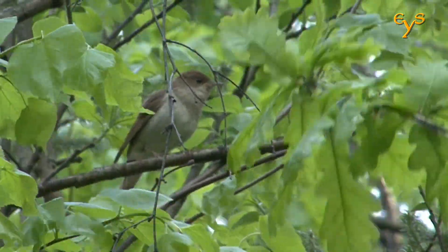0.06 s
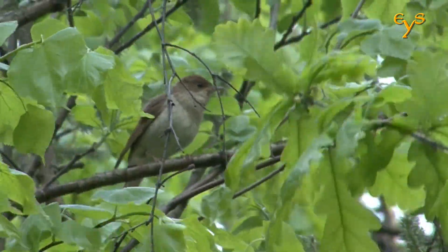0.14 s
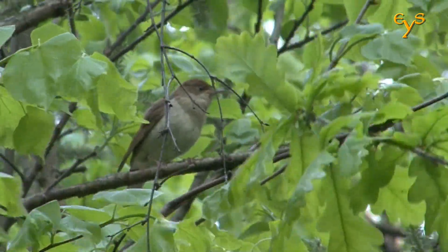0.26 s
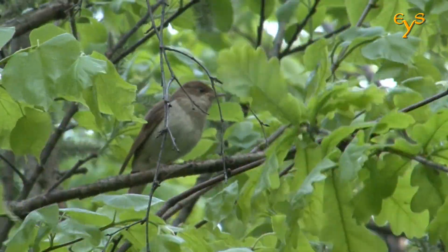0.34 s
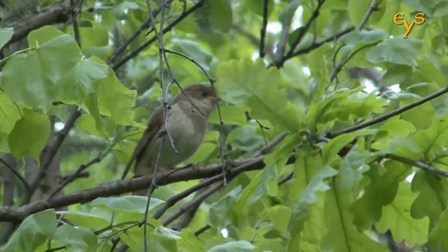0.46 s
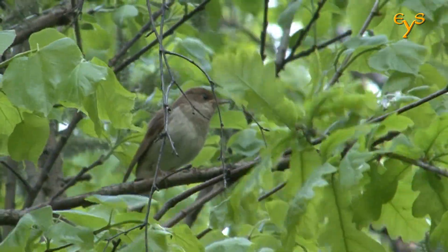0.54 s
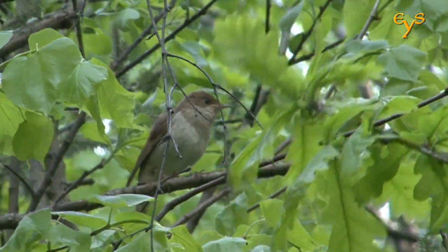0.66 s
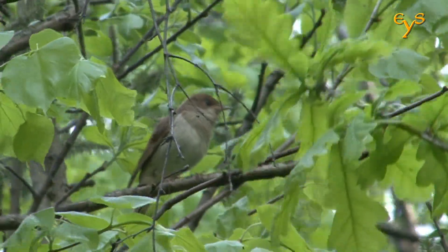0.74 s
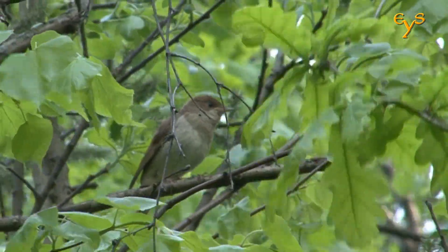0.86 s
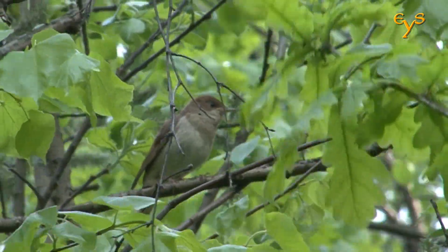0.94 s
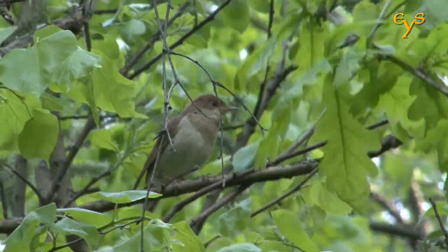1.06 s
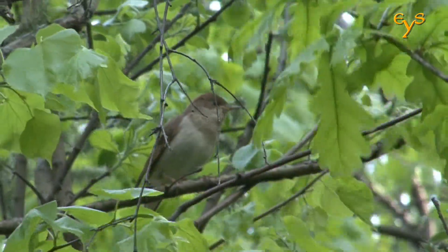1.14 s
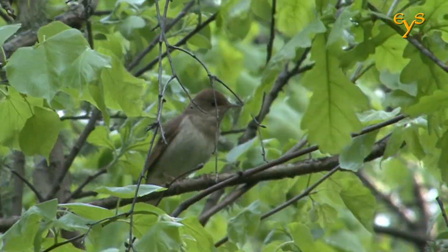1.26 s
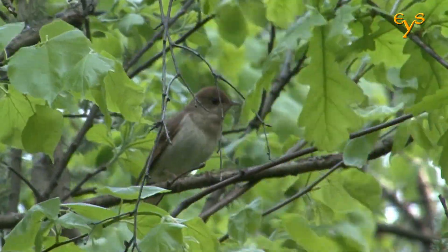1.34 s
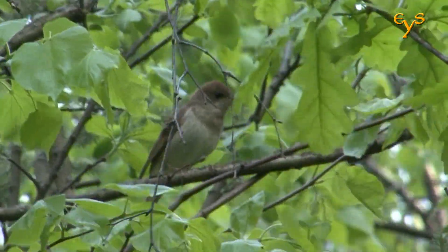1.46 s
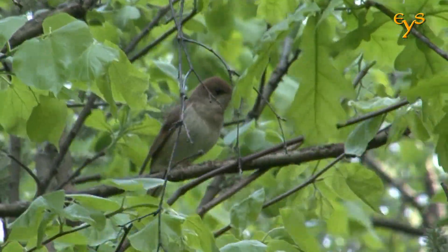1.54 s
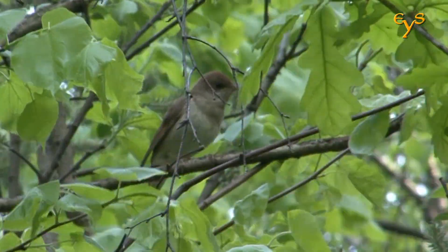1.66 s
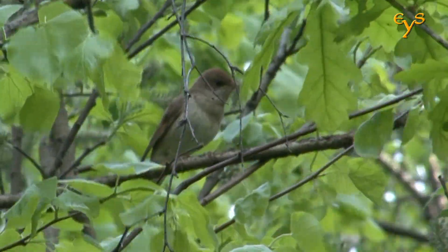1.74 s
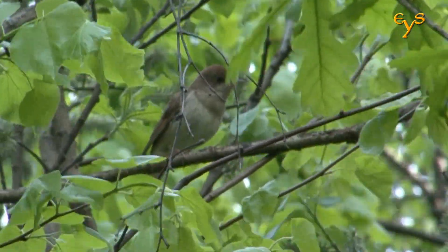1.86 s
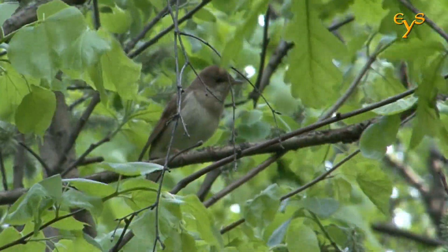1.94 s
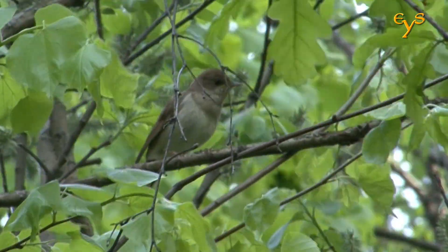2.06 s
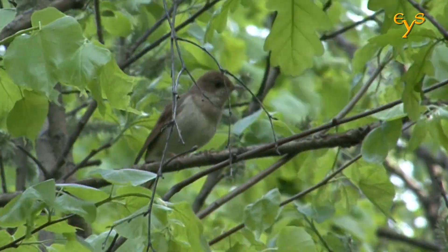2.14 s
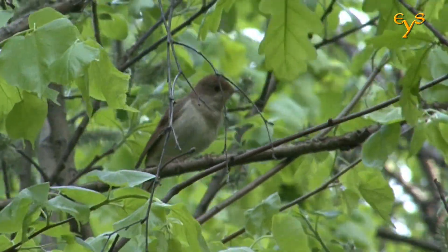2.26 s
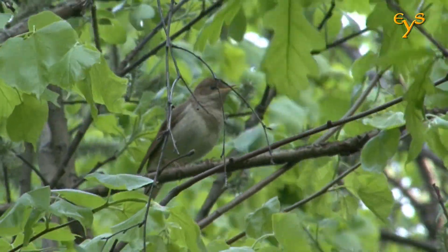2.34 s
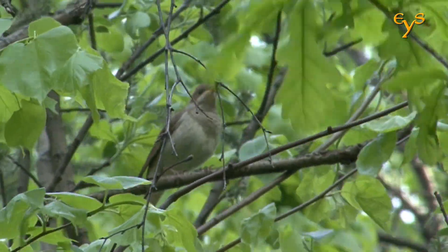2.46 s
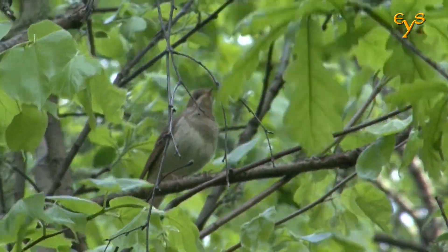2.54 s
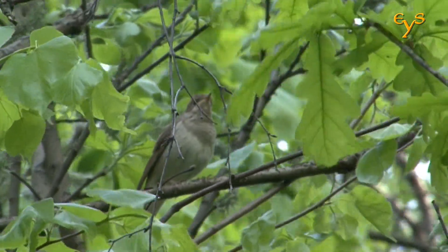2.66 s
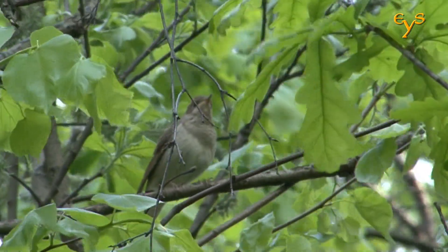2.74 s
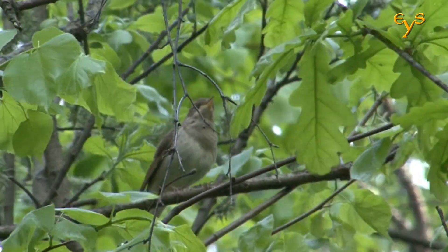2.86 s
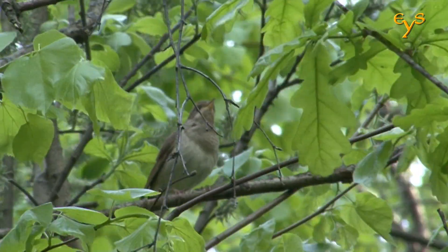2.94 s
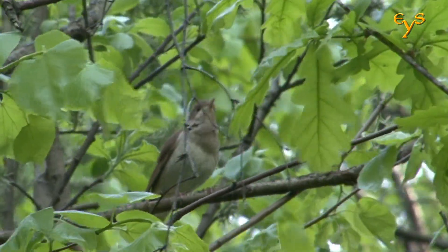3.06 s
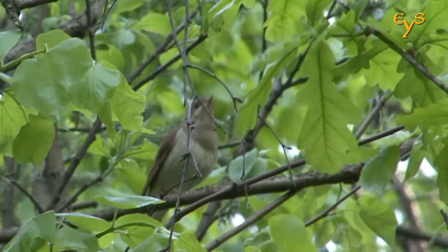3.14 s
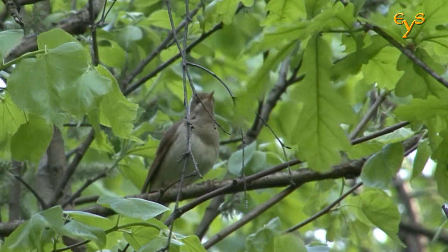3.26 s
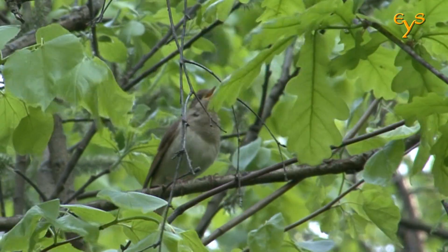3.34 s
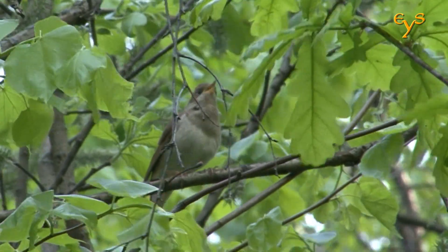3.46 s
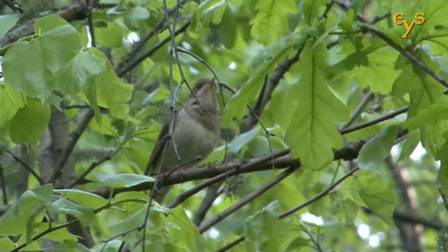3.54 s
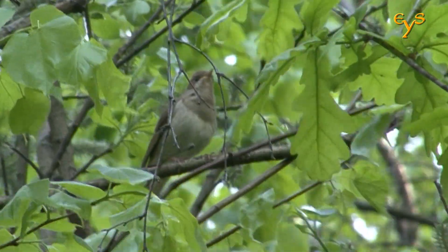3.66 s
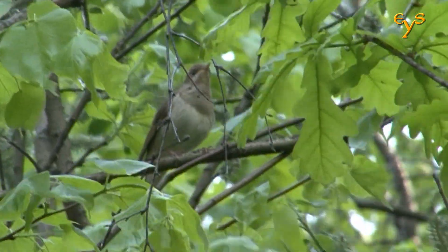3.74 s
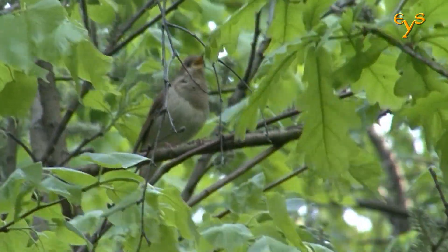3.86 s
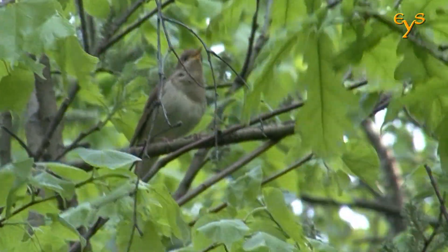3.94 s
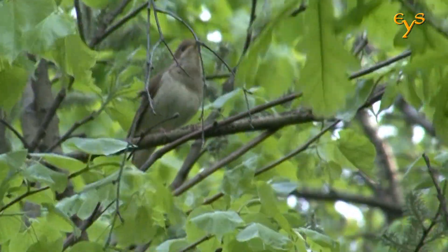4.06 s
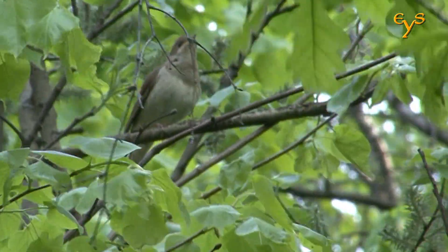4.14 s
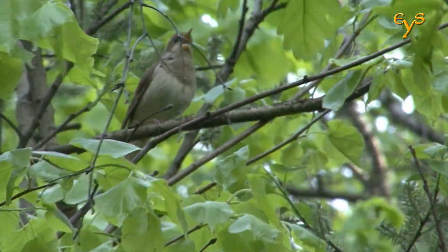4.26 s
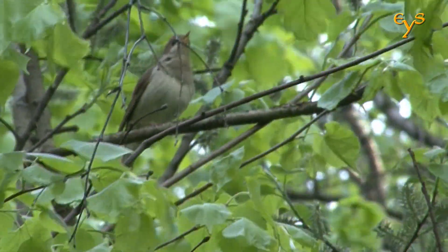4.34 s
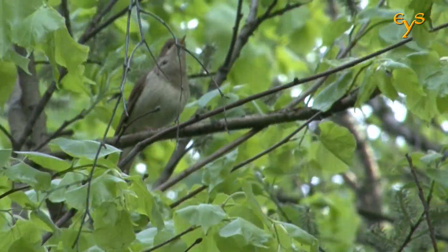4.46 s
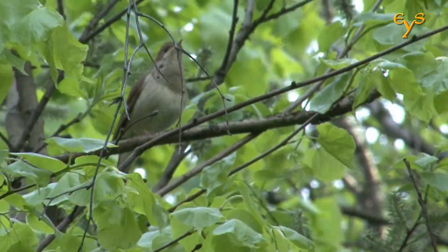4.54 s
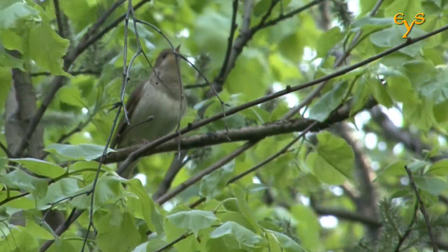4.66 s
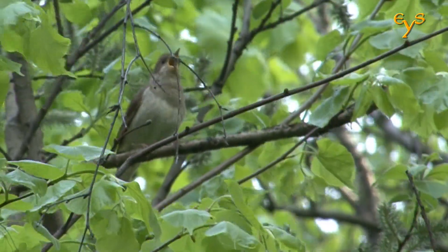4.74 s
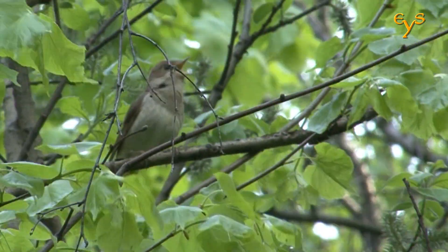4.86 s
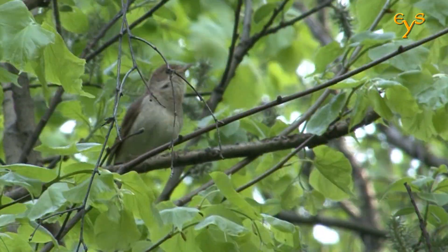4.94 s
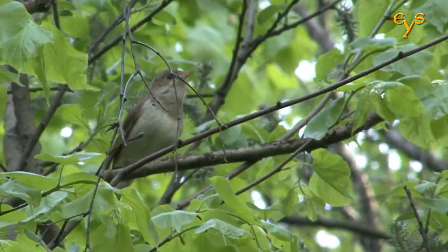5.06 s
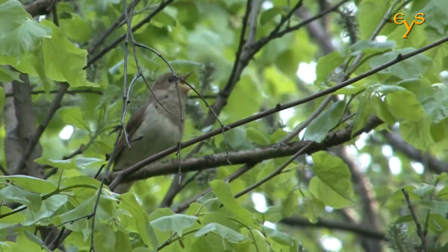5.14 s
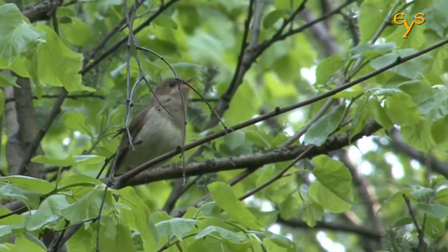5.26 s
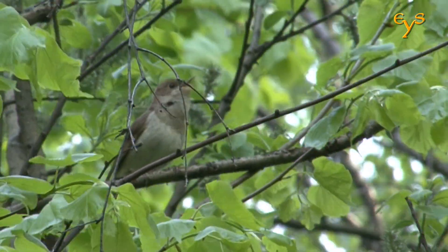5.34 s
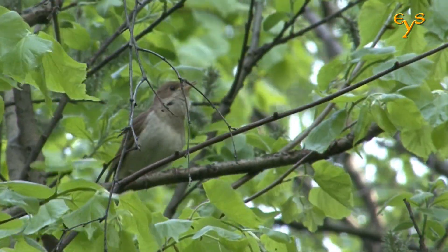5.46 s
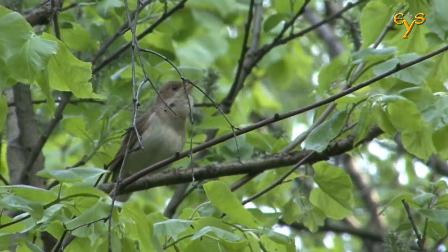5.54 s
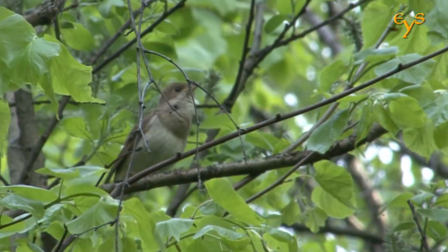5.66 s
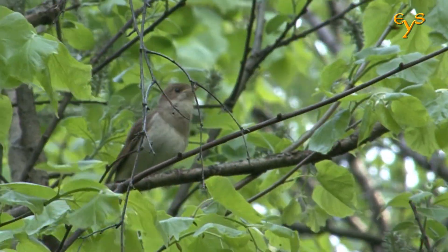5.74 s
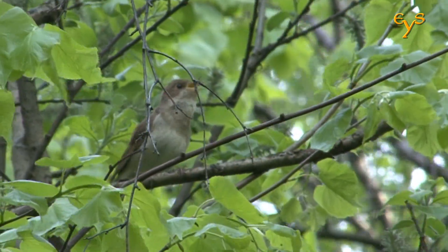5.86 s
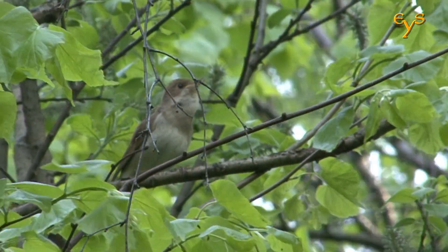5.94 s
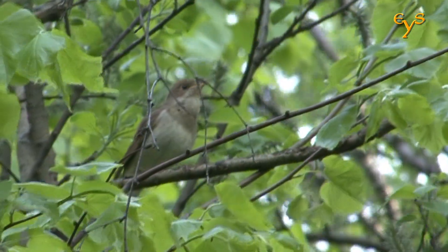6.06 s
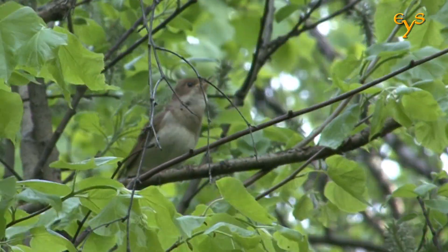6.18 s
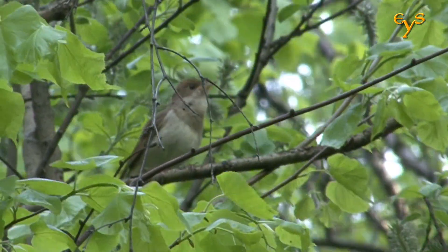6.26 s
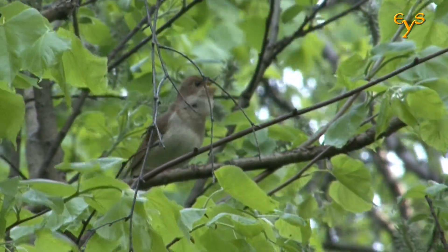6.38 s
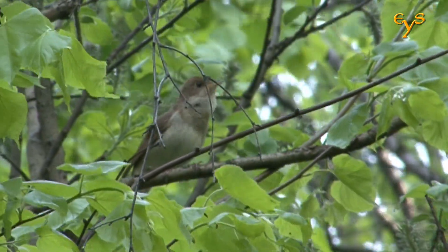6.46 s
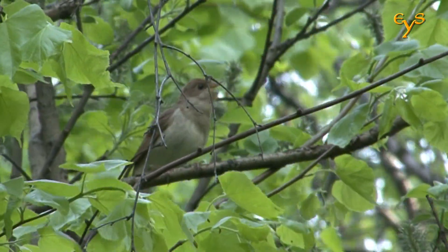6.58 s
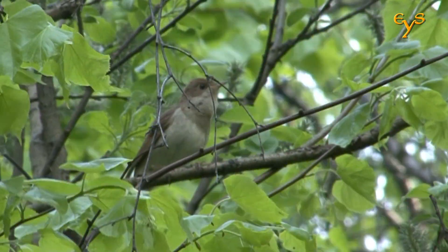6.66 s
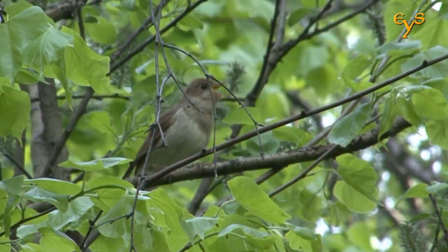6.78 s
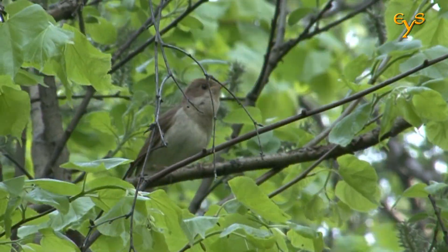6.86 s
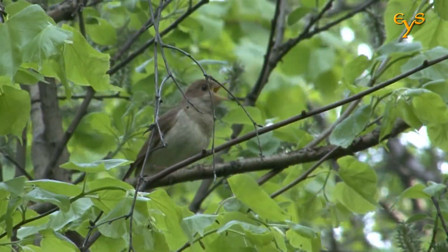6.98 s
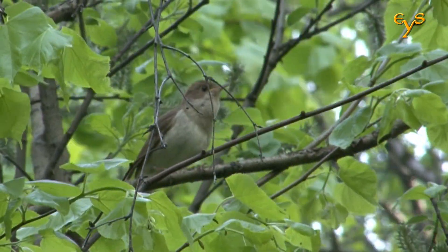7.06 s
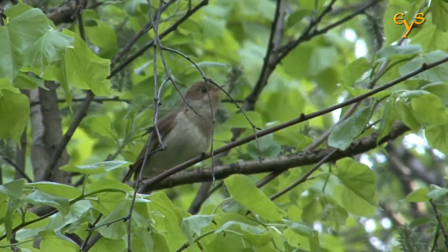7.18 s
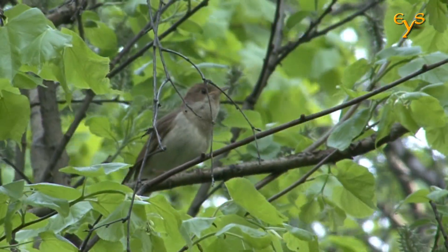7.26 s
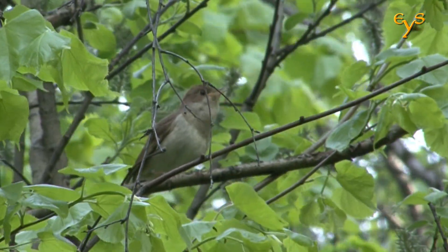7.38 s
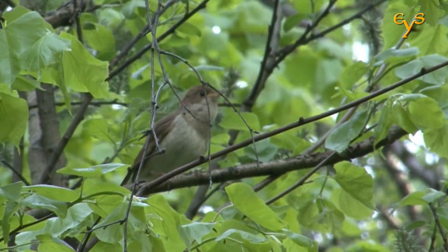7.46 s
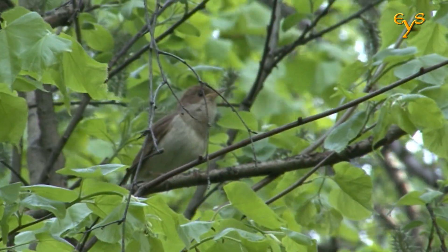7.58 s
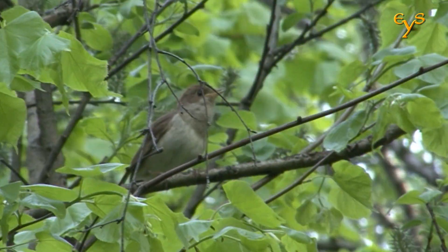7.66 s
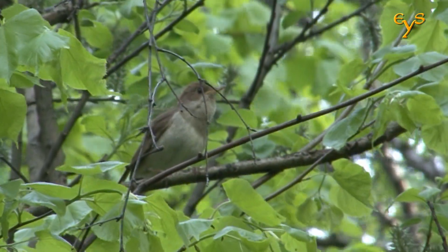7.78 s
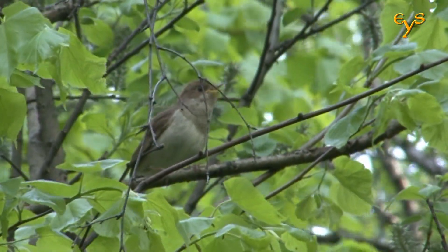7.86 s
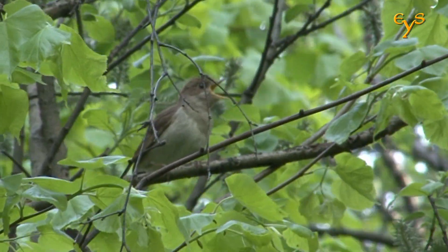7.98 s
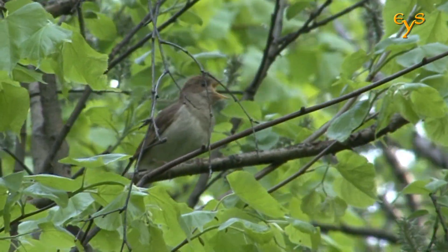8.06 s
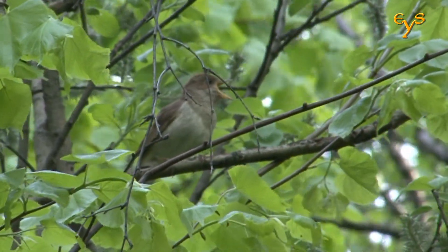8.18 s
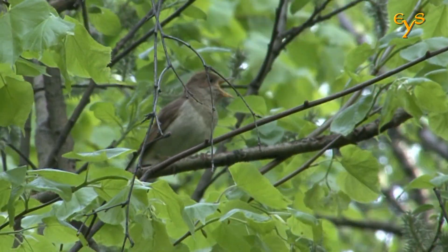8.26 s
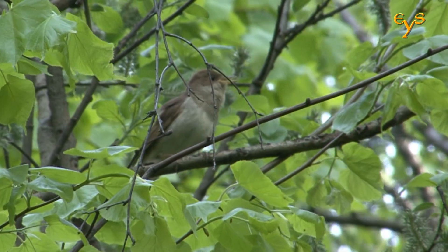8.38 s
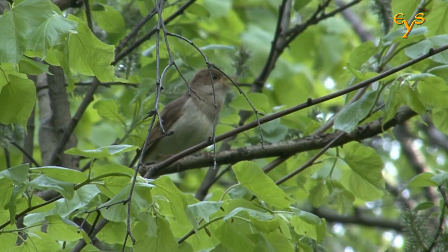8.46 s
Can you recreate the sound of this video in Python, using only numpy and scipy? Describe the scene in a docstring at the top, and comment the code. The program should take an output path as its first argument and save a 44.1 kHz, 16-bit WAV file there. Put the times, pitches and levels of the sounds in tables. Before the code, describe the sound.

Faint chirps and a repeated high motif come from deep among trees, above a distant engine-like rumble. After two seconds a close songbird enters very quietly, then swells through paired clear whistles and quick falling slurs. Soft hoots lead into diving, flute-like notes; separate hard clicks follow, ending in a fast raspy trill. Stereo outdoor sound, singer mostly direct, notes scattered by foliage.

```python
"""Nightingale in a spring wood

A nightingale sings one phrase from a branch: a thin high note, six swelling pairs of whistle and
downslur, two low flute figures, seven dry clicks and a fast rattle. Notes are gliding sines with
overtones; clicks and rattle are coloured noise, the clicks with added pulses. Other birds call farther
off in pure tones. Leaves and trunks scatter every note as echoes over a steady distant rumble of
shaped noise, with engine drones, leaf hiss and one faint tone."""
import sys
import numpy as np
from scipy import signal
from scipy.fft import rfft, irfft, next_fast_len
from scipy.io import wavfile
from scipy.ndimage import uniform_filter1d

SR = 44100
rng = np.random.default_rng(int(sys.argv[2]) if len(sys.argv) > 2 else 0)


def persist_wave(psi):
    """Save psi, clipped to +-1, as 16-bit WAV."""
    counts = np.round(np.clip(psi, -1, 1) * 32767).astype(np.int16)
    wavfile.write(sys.argv[1], SR, np.atleast_2d(counts).T)


N = 375291
CUT_HZ = 15900  # top of the recorded band


def amp(db):
    """Decibels to gain."""
    return 10 ** (np.asarray(db) / 20)


def unit(x):
    """Scales to rms 1."""
    return x / np.sqrt(np.mean(x ** 2) + 1e-20)


def read(points, hz):
    """Reads a table on a log-frequency axis."""
    f, value = np.transpose(points)
    return np.interp(np.log(hz + 1), np.log(f + 1), value)


def add(mix, s, sound):
    """Mixes a sound in at time s."""
    part = mix[max(round(s * SR), 0):][:len(sound)]
    part += sound[:len(part)]


def wander(n, hz):
    """Smooth random drift of about rms 1, mostly slower than hz."""
    size = next_fast_len(n + SR // 4)
    f = np.fft.rfftfreq(size, 1 / SR)
    spectrum = rfft(rng.standard_normal(size)) * np.exp(-(f / hz) ** 2)
    return unit(irfft(spectrum))[:n]


def colour(x, points):
    """Minimum-phase filter with the given spectrum, so that nothing sounds before its cause."""
    gain_db = read(points, abs(np.fft.fftfreq(2048, 1 / SR)))
    response = np.exp(np.conj(signal.hilbert(np.log(amp(gain_db)))))
    return signal.oaconvolve(x, np.fft.ifft(response).real[:SR // 100])


def stereo_noise(spectrum):
    """Noise of one spectrum at both microphones, less alike from left to right toward the treble."""
    # left-right likeness: [f/Hz, correlation]
    likeness = [(60, 1), (130, 0.97), (290, 0.89), (640, 0.59), (1410, 0.61), (3100, 0.49), (7000, 0.37),
                (15000, 0.54)]
    # left minus right: [f/Hz, level/dB]
    balance = [(120, 0), (400, -0.7), (1200, -1.8), (4400, -1.2), (8000, 0)]
    hz = np.fft.rfftfreq(N, 1 / SR)
    same = read(likeness, hz)
    lean = amp(read(balance, hz) * np.array([[.5], [-.5]]))
    a, b = rng.standard_normal((2, len(hz))) + 1j * rng.standard_normal((2, len(hz)))
    both = np.array([a, same * a + np.sqrt(1 - same ** 2) * b])
    return unit(irfft(both * lean * amp(read(spectrum, hz)), N))


def distant_rumble(level_db=-37.5, swell_db=0.31, swell_hz=0.94):
    """Low-heavy noise from far away, its level all but steady."""
    # spectrum before levelling: [f/Hz, level/dB]
    rumble_colour = [(12, -34), (20, -12.5), (87, -2), (103, -5), (119, -6), (157, -7.5), (193, -11),
                     (237, -10), (454, -12), (489, -12), (671, -13.5), (904, -12), (1110, -11),
                     (1220, -13.5), (1700, -22), (2210, -29.5), (3740, -120)]
    return amp(level_db + swell_db * wander(N, swell_hz)) * stereo_noise(rumble_colour)


def leaf_hiss(level_db=-46, swell_db=0.53, swell_hz=2):
    """Broad noise of leaves, swelling slightly."""
    # spectrum before levelling: [f/Hz, level/dB]
    leaf_colour = [(1000, -10), (1600, 2.5), (2200, -2), (3000, -7), (4200, -9), (5800, -8.5), (7500, -12),
                   (10000, -19.5), (12500, -27), (15000, -33), (16000, -37)]
    return amp(level_db + swell_db * wander(N, swell_hz)) * stereo_noise(leaf_colour)


def engine_drones():
    """Far engines: narrow bands, each a sine and a cosine whose strengths drift apart."""
    # drones: [f/Hz, drift rate of the strengths/Hz, level/dB]
    engines = [(94.6, 7.1, -45), (168, 8.1, -54.5)]
    t = np.arange(N) / SR
    out = np.zeros(N)
    for hz, drift_hz, db in engines:
        in_phase = wander(N, drift_hz) * np.cos(2 * np.pi * hz * t)
        quadrature = wander(N, drift_hz) * np.sin(2 * np.pi * hz * t)
        out += amp(db) * (in_phase + quadrature)
    return out


def faint_tone(hz=1140, drift_hz=4, level_db=-44.5):
    """A distant sine, slightly unsteady in pitch, that fades in and out once."""
    phase = 2 * np.pi * np.cumsum(hz + drift_hz * wander(N, 13)) / SR
    fade = np.interp(np.arange(N) / SR, [.95, 1.15, 1.85, 2.1], [0, 1, 1, 0])
    return amp(level_db) * np.sin(phase) * fade


def background():
    """The bed: rumble, leaves, drones and the faint tone simply sum."""
    return distant_rumble() + leaf_hiss() + engine_drones() + faint_tone()


def wood(x, leaves_db, trunks_db, leaves_t60=0.19, build_s=0.018):
    """Near leaves scatter a quick spray of echoes; trunks farther off return a long thin tail."""
    # decay time of the trunk tail, shorter in the treble: [f/Hz, T60/s]
    trunk_decay = [(1200, 0.98), (2500, 0.82), (5000, 0.64), (8000, 0.55), (13000, 0.37)]
    # one echo at a random instant in each slot, separately at each microphone
    slot = SR // 4000
    starts = np.arange(slot * 6, SR - slot, slot)
    shape = (2, len(starts))
    taps = np.zeros((2, SR))
    np.put_along_axis(taps, starts + rng.integers(0, slot, shape), rng.standard_normal(shape), 1)
    taps = taps + 0.3 * taps[::-1]  # close microphones share part of each echo
    t = np.arange(SR) / SR
    leaves = taps * amp(-60 * t / leaves_t60)
    # the trunks use the echoes in reverse order and decay band by band
    hz, frame_s, bands = signal.stft(taps[:, ::-1], SR, nperseg=256)
    decay = amp(-60 * frame_s / read(trunk_decay, hz)[:, None])
    trunks = signal.istft(bands * decay, SR, nperseg=256)[1][:, :SR]
    trunks = trunks * (1 - np.exp(-t / build_s))
    echo = (amp(leaves_db) * unit(leaves) + amp(trunks_db) * unit(trunks)) / np.sqrt(SR)
    # the beak beams its treble forward, so less of it reaches the trees
    beam_db = read([(2000, 1.9), (6000, 0.5), (12000, 0.5)], np.fft.rfftfreq(SR, 1 / SR))
    echo = irfft(rfft(echo) * amp(beam_db))
    return x + signal.fftconvolve(x[None], echo, axes=1)[:, :N]


def whistle(note, edge_db, jitter=0.006, fade_s=0.0053, press=0.32, register_hz=2350):
    """The syrinx sings a near sine; pressed harder it adds overtones, coloured by the windpipe."""
    # the windpipe passes overtones best near 11 kHz: [f/Hz, level/dB]
    windpipe = [(2500, -18), (4200, -24.5), (6300, -27), (7600, -22.5), (8800, -20.5), (10400, -9.5),
                (11500, -15.5), (12800, -22.5), (14500, -29), (16000, -35)]
    # harmonics 2 to 8, from 3 up against the note's edge: [level/dB]
    # high whistles stress the third, low flute notes are richer
    high_voice = [-3, -1.5, -17.5, -12, -10, -24, -30]
    low_voice = [-5, 0, -10, -5.5, 3, -6, -5]
    s, hz, db = np.transpose(note)
    s = np.maximum.accumulate(s)
    t = np.arange(s[0], s[-1] + fade_s / 2, 1 / SR)
    glide = uniform_filter1d(np.interp(t, s, hz), size=400, mode="nearest")
    # wide slurs are less steady than held notes
    unsteadiness = jitter * (0.14 + 3 * np.ptp(np.log(hz)))
    pitch = glide * (1 + unsteadiness * wander(len(t), 160))
    phase = 2 * np.pi * np.cumsum(pitch) / SR
    level = np.interp(t, s, amp(db))
    tone = np.sin(phase)
    if edge_db is not None:
        voice = high_voice if hz.mean() > register_hz else low_voice
        pressure = (level / level.max()) ** press
        for k, source_db in enumerate(voice, 2):
            overtone_db = edge_db * (k > 2) + source_db + read(windpipe, k * pitch)
            in_band = k * pitch < CUT_HZ
            tone += amp(overtone_db) * pressure * in_band * np.sin(k * phase)
    to_edge = np.minimum(t - t[0], t[-1] - t)
    fade = np.sin(np.pi / 2 * np.clip(to_edge / fade_s, 0, 1)) ** 2
    return s[0], tone * fade * level


def course(length, count=48):
    """Instants through a note: in seconds, and as shares of its length."""
    u = np.linspace(0, 1, count)
    return u * length, u


def swell(u, peak, start_db, end_db):
    """Level in dB of a note that grows to one peak (a share of its length) and falls away."""
    rise = start_db * (1 - u / peak) ** 2
    fall = end_db * ((u - peak) / (1 - peak)) ** 2
    return np.where(u < peak, rise, fall)


def slide(s, length, first_hz, last_hz, db, shape, bend=1.35):
    """A far bird's glide, gentle then steeper, under one swell: rows (s, Hz, dB)."""
    t, u = course(length)
    return np.c_[s + t, first_hz + (last_hz - first_hz) * u ** bend, db + swell(u, *shape)]


def motif_bird():
    """A second bird repeats a motif: a pip, then a soft rise and a slur that levels off."""
    # calls: [t/s, pip f/Hz, pip level/dB, level of the rest/dB]
    calls = [(.01, 5460, -44.5, -41), (0.417, 5320, -40.5, -39.5), (.85, 5400, -38, -37),
             (1.272, 5340, -35, -37.5), (2.288, 5470, -38.5, -35), (3.935, 5050, -39, -38),
             (4.322, 5330, -45, -36), (5.308, 5340, -39, -35), (5.696, 5360, -36.5, -34),
             (6.103, 5300, -34, -33.5)]
    # the rest: [t after call start/s, length/s, first f/Hz, last f/Hz,
    # level against the rest/dB, loudest at this share of the part]
    motif = [(0.02, 0.094, 3900, 4090, -13.5, 0.47), (0.097, 0.05, 5140, 4430, 3, 0.75),
             (0.146, 0.036, 4430, 4470, -5.5, 0.18)]
    pip_s, pip_lift = 0.039, 0.019  # length, and the share by which the pip rises
    out = np.zeros(N)
    for s, pip_hz, pip_db, db in calls:
        pip = slide(s, pip_s, pip_hz, pip_hz * (1 + pip_lift), pip_db, (0.23, -3, -14))
        add(out, *whistle(pip, None))
        for after, length, first_hz, last_hz, part_db, peak in motif:
            part = slide(s + after, length, first_hz, last_hz, db + part_db, (peak, -14, -5))
            add(out, *whistle(part, None))
    return out


def far_chirps():
    """Short straight glides, loudest halfway and falling off more than they rise."""
    # chirps: [t/s, length/s, first f/Hz, last f/Hz, level at the middle/dB]
    chirps = [(0.253, 0.017, 2600, 1770, -35), (0.743, 0.036, 2820, 2490, -45),
              (0.777, 0.019, 2736, 1730, -28), (0.933, 0.047, 2930, 2610, -42.5),
              (0.985, 0.032, 2990, 2580, -45), (1.233, 0.017, 2590, 1744, -29.5),
              (1.76, 0.028, 5650, 6900, -42.5), (1.783, .028, 6300, 5970, -48),
              (2.066, 0.052, 6740, 6670, -46), (3.973, 0.092, 2620, 2730, -38.5),
              (4.135, 0.055, 2700, 2580, -35.5), (4.353, 0.037, 2660, 2560, -34.5),
              (4.804, 0.02, 5320, 7000, -30.5), (4.963, 0.045, 6100, 5460, -43),
              (5.094, 0.041, 6300, 5050, -36.5), (5.102, 0.046, 6920, 6940, -35),
              (5.24, .045, 6100, 5300, -38), (5.772, 0.11, 3010, 3590, -37), (5.85, 0.095, 3330, 4170, -42),
              (7.066, 0.059, 3600, 2760, -42)]
    out = np.zeros(N)
    for s, length, first_hz, last_hz, db in chirps:
        start = (s, first_hz, db - 4)
        middle = (s + length / 2, (first_hz + last_hz) / 2, db)
        end = (s + length, last_hz, db - 17.0)
        add(out, *whistle([start, middle, end], None, jitter=0.027))
    return out


def far_ticks():
    """Evenly spaced runs of very short falling glides."""
    # runs: [first t/s, spacing/s, run ends before t/s, central f/Hz, level/dB]
    runs = [(.47, .072, .7, 5600, -41.5), (1.0, 0.07, 1.16, 5730, -41), (1.51, .062, 2.09, 2200, -41)]
    out = np.zeros(N)
    for first, apart, last, hz, db in runs:
        for s in np.arange(first, last, apart):
            tick = [(s, hz * 1.2, db), (s + 0.0082, hz * 0.843, db)]
            add(out, *whistle(tick, None))
    return out


def far_birds():
    """Pure tones: distance has taken their overtones."""
    return motif_bird() + far_chirps() + far_ticks()


def airflow(t, attack_s, flutter_db=1.07, flutter_hz=60):
    """Level in dB of the air through the syrinx: a quick attack, then a slight flutter."""
    attack_db = 20 * np.log10(np.clip(t / attack_s, .1, 1))
    return attack_db + flutter_db * wander(SR // 2, flutter_hz)[(t * SR).astype(int)]


def held_note(s, length, hz, scoop, db, droop, shape):
    """Slides down onto a pitch, wavers and swells on it, and sags at the end: rows (s, Hz, dB)."""
    scoop_s, scoop_curve = .02, 1.49  # how the pitch settles
    waver, waver_hz = 0.0041, 22  # rms share of the pitch, and about how fast
    droop_s, droop_curve = 0.01308, 1.38  # over how long it sags, and how abruptly
    t, u = course(length)
    settle = 1 + scoop * np.exp(-(t / scoop_s) ** scoop_curve)
    wavering = 1 + waver * wander(SR // 2, waver_hz)[(t * SR).astype(int)]
    sag = 1 - droop * np.exp(-((length - t) / droop_s) ** droop_curve)
    level_db = db + airflow(t, attack_s=.013) + swell(u, *shape)
    return np.c_[s + t, hz * settle * wavering * sag, level_db]


def whistles():
    """Held whistles, each entered from above and sagging slightly as it ends."""
    # notes: [t/s, length/s, held f/Hz, starts higher by this share, level/dB,
    # edge = strength of harmonics 3 and up/dB]
    notes = [(2.378, .25, 8050, 0.16, -37, -30), (2.947, 0.072, 4176, 0.091, -28.5, -20),
             (3.377, 0.11, 3920, 0.17, -23.5, -20), (3.865, 0.11, 3764, 0.11, -18, -7.5),
             (4.299, 0.099, 3632, 0.13, -13.5, -3), (4.762, 0.1, 3810, 0.11, -9, -1),
             (5.189, .131, 3748, 0.18, -12, 0)]
    out = np.zeros(N)
    for s, length, hz, scoop, db, edge_db in notes:
        note = held_note(s, length, hz, scoop, db, droop=0.03, shape=(0.71, -8.5, -13.5))
        add(out, *whistle(note, edge_db))
    return out


def downslur(s, length, first_hz, db, fall_hz_per_s=23400):
    """A fast, even fall of pitch under one swell, speaking faster than a held note: rows (s, Hz, dB)."""
    t, u = course(length)
    level_db = db + airflow(t, attack_s=0.0063) + swell(u, 0.58, -17, -16.5)
    return np.c_[s + t, first_hz - fall_hz_per_s * t, level_db]


def downslurs():
    """The falls that answer the whistles, all at one speed."""
    # slurs: [t/s, length/s, first f/Hz, level/dB, edge/dB]
    slurs = [(3.086, 0.058, 4160, -27.5, -16), (3.546, 0.054, 3780, -19.5, -6),
             (4.034, 0.052, 3726, -16.5, -4.5), (4.469, .056, 3744, -11, -9),
             (4.924, 0.062, 3894, -9.7, -5.5), (5.381, 0.061, 3790, -11, -7)]
    out = np.zeros(N)
    for s, length, hz, db, edge_db in slurs:
        add(out, *whistle(downslur(s, length, hz, db), edge_db))
    return out


def hoots():
    """Soft low held notes that lead into the flute figures."""
    # hoots: [t/s, length/s, f/Hz, level/dB, edge/dB]
    low_notes = [(5.654, .09, 1294, -29, -15), (6.241, .069, 1360, -23.5, -18.5)]
    out = np.zeros(N)
    for s, length, hz, db, edge_db in low_notes:
        note = held_note(s, length, hz, 0, db, droop=0.084, shape=(0.79, -5, -4))
        add(out, *whistle(note, edge_db))
    return out


def flick(s, top_hz, db, length=.046, arch=.27, peak=0.55):
    """A quick arch of pitch from a share below its top, highest where loudest: rows (s, Hz, dB)."""
    t, u = course(length)
    pitch = top_hz * (1 - arch * abs(u / peak - 1) ** 1.5)
    return np.c_[s + t, pitch, db + swell(u, peak, -16, -15)]


def flute_figures(length=.064, scoop=0.0544, dive=0.333, edge_db=-11.5):
    """Low notes that dive by a third of their pitch, each with a flick back up."""
    # figures: [t/s, f/Hz, level/dB, flick t after start/s, flick top f/Hz, flick level/dB]
    figures = [(5.924, 2050, -16, .077, 2014, -18), (6.437, 2090, -14.5, .074, 2155, -14)]
    out = np.zeros(N)
    for s, hz, db, after, flick_hz, flick_db in figures:
        note = held_note(s, length, hz, scoop, db, dive, shape=(0.48, -5, -16))
        add(out, *whistle(note, edge_db))
        add(out, *whistle(flick(s + after, flick_hz, flick_db), edge_db))
    return out


def click(s, db, modes, length=.0046, slap_hz=1500, air=0.65, ring_db=-3.5, damping_hz=650):
    """The syrinx slaps shut a few times in quick, uneven succession and rings the throat."""
    # the broad snap under the resonances: [f/Hz, level/dB]
    snap = [(1000, -37), (1800, -18.5), (2700, -14), (4000, -10.5), (6000, 0), (8000, -16), (9500, -14.5),
            (11000, -17.5), (12500, -16), (13500, -37), (16000, -50)]
    n = int(length * SR)
    turns = np.cumsum(slap_hz * np.exp(.4 * wander(n, 1200))) / SR
    slaps = np.diff(np.floor(turns), prepend=-1)  # one pulse for each whole turn
    burst = np.sin(np.pi * np.linspace(.15, 1, n) ** 0.95) ** 2
    drive = (unit(slaps) + air * rng.standard_normal(n)) * burst
    f = np.linspace(0, SR / 2, SR // 100)
    top_db = max(mode[2] for mode in modes)
    power = amp(read(snap, f)) ** 2
    for hz, width, mode_db in modes:
        detune = 2 * (f - hz) / (width + damping_hz)
        power += amp(ring_db + mode_db - top_db) ** 2 / (1 + detune ** 2) ** 2
    sound = colour(drive, np.c_[f, 10 * np.log10(power)])
    return s, amp(db) * sound * np.sqrt(n / np.sum(sound ** 2))


def clicks():
    """Dry clicks, the throat set anew for each."""
    # clicks: [t/s, level/dB, low, middle and high throat resonance f/Hz]
    snaps = [(6.7051, -17.5, 4640, 6000, 7900), (6.8996, -16, 4700, 5300, 7000),
             (7.0851, -17.5, 4570, 5630, 7100), (7.2623, -17, 5500, 6220, 7760),
             (7.454, -16, 5400, 6100, 7760), (7.63, -17, 4460, 5500, 7000),
             (7.815, -17.5, 4530, 5500, 5990)]
    # low, middle and high resonance: [width before damping is added/Hz, relative level/dB]
    throat = [(260, 0), (280, -1.5), (280, -6)]
    out = np.zeros(N)
    for s, db, *resonances in snaps:
        modes = [(hz, *mode) for hz, mode in zip(resonances, throat)]
        add(out, *click(s, db, modes))
    return out


def puffs(count=23):
    """Beat of the rattle, quick short puffs then slower longer ones: rows (s, dB, half width s)."""
    start_s, slows_s = 7.9925, 8.2
    quick_gap_s, slow_gap_s = .01765, .0207  # from puff to puff
    s = start_s + quick_gap_s * np.arange(count)
    s = s + np.maximum(s - slows_s, 0) * (slow_gap_s / quick_gap_s - 1)
    width = np.interp(s - slows_s, [-.06, 0], [0.0027, 0.0039])
    db = -22.5 + 1.2 * rng.standard_normal(count)
    # lean on the first puff and let the last go
    width[0], db[0], db[-1] = 0.0048, -20.5, -27.5
    return np.c_[s, db, width]


def rattle(purr=0.37, purr_hz=1100, sustain_db=-42, low_hz=2960):
    """Some fifty harsh puffs a second, each roughened by irregular beats of the syrinx."""
    # rasp before the steep low cut: [f/Hz, level/dB]
    rasp_colour = [(1710, -38), (2900, -11), (3110, -8.5), (3890, -11), (4290, -4.5), (4910, -12),
                   (5380, 0.5), (5690, 1), (7800, -7), (8480, -16), (9550, -12.5), (11100, -17),
                   (13600, -26), (14700, -39), (15500, -47)]
    beat = puffs()
    t = np.arange(beat[0, 0] - .02, beat[-1, 0] + .02, 1 / SR)
    power = amp(sustain_db) ** 2 * signal.windows.tukey(len(t), .06)
    for s, db, width in beat:
        power += amp(db) ** 2 * np.exp(-((t - s) / width) ** 2)
    turns = np.cumsum(purr_hz * np.exp(0.25 * wander(len(t), 530))) / SR
    drive = rng.standard_normal(len(t)) * (1 + purr * np.cos(2 * np.pi * turns))
    rasp = colour(drive, rasp_colour)[:len(t)]
    # steady air pressure keeps the puffs even
    rasp = rasp / np.sqrt(uniform_filter1d(rasp ** 2, size=220) + 1e-12)
    low_cut = signal.butter(N=10, Wn=low_hz, btype="high", fs=SR, output="sos")
    return t[0], signal.sosfilt(low_cut, np.sqrt(power) * rasp)


def nightingale():
    """One syrinx: whistles and downslurs, hoots and flute figures, then clicks, then the rattle."""
    out = whistles() + downslurs() + hoots() + flute_figures() + clicks()
    add(out, *rattle())
    return out


def scene():
    """The singer is close and nearly dry; the others are deep in the trees."""
    near = wood(nightingale(), leaves_db=-6.5, trunks_db=-14.5)
    far = wood(far_birds(), leaves_db=-6.0, trunks_db=-7.5)
    return near + far + background()


def record(dry):
    """The recorder's band limit."""
    low_pass = signal.firwin(511, CUT_HZ, window=("kaiser", 9), fs=SR)
    return signal.oaconvolve(dry, low_pass[None], "same")


dry = scene()
out = record(dry)
persist_wave(out)
```